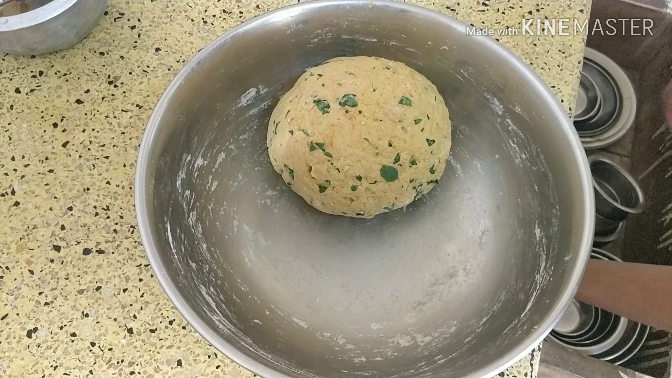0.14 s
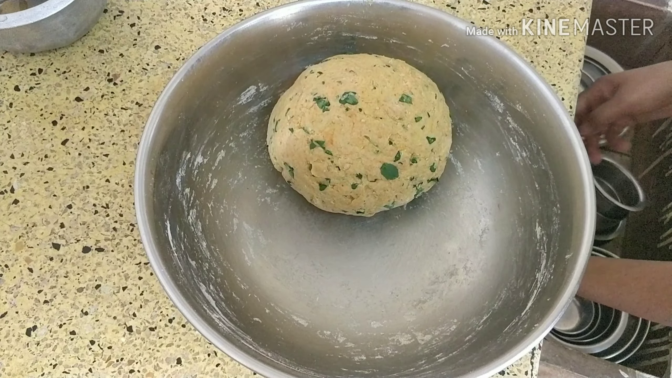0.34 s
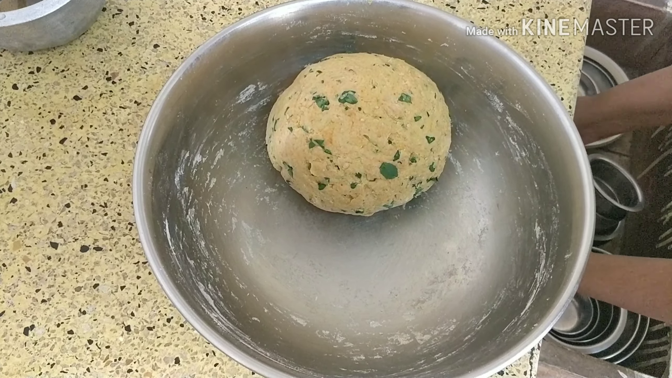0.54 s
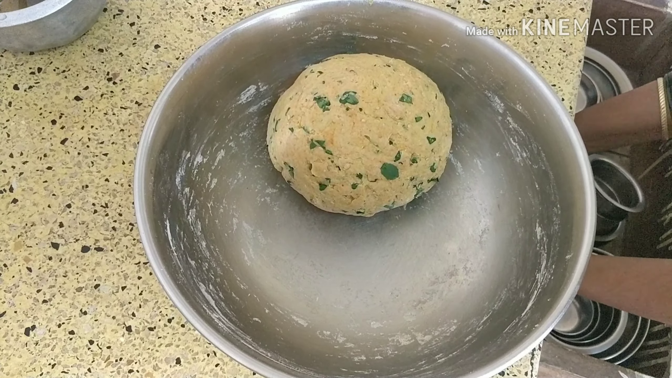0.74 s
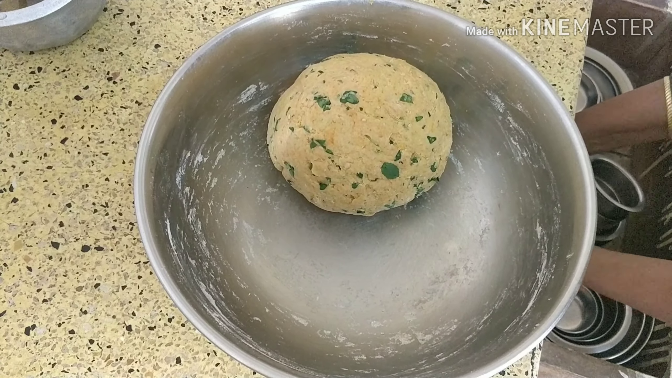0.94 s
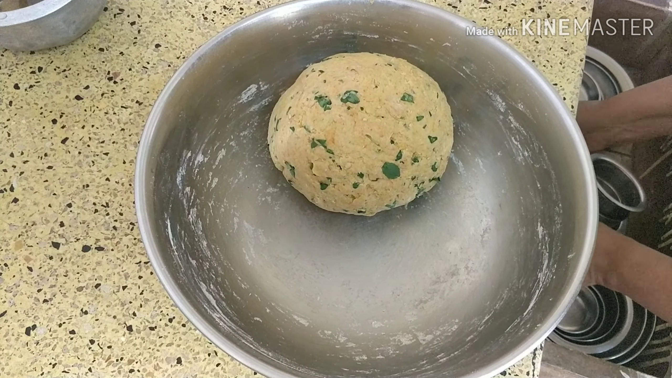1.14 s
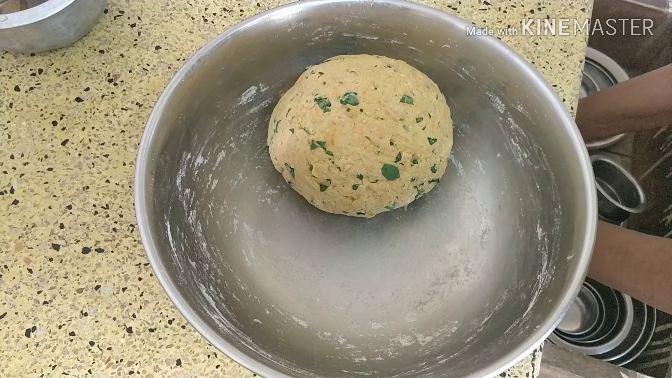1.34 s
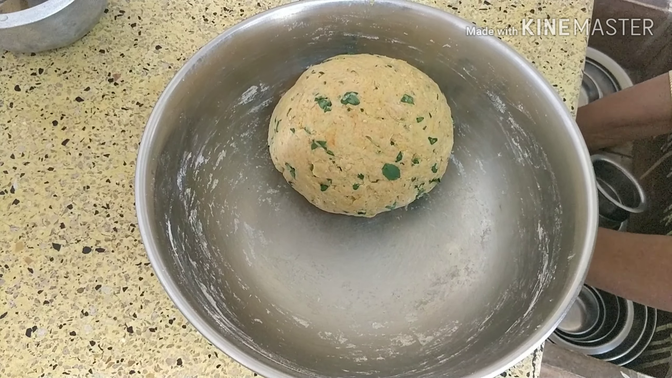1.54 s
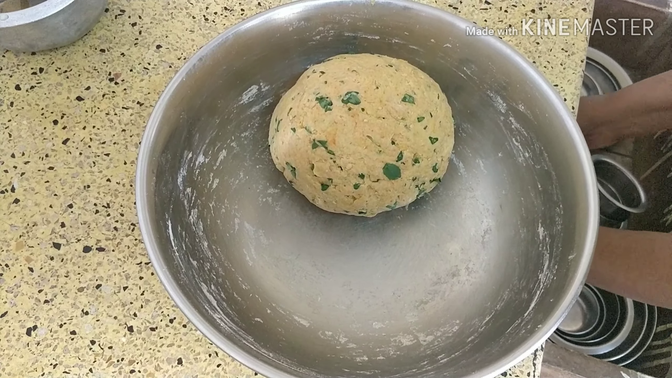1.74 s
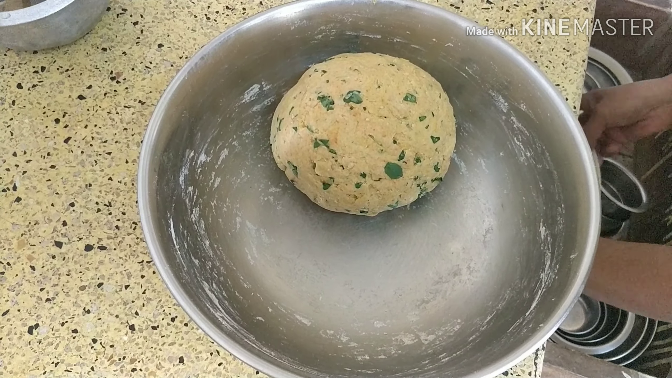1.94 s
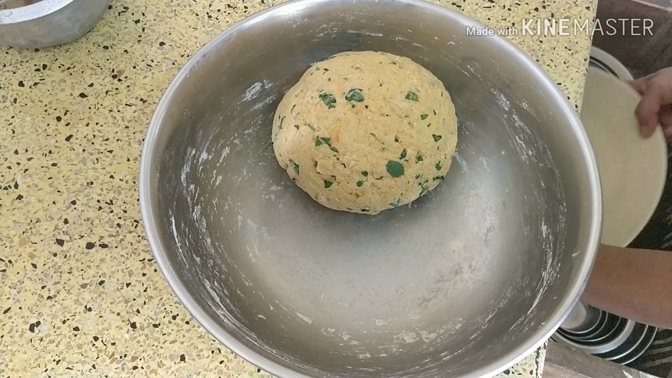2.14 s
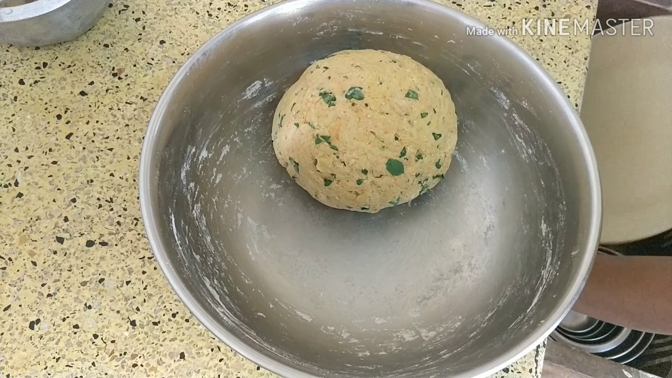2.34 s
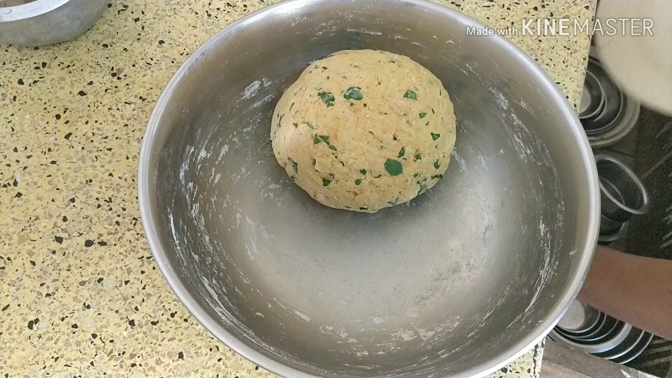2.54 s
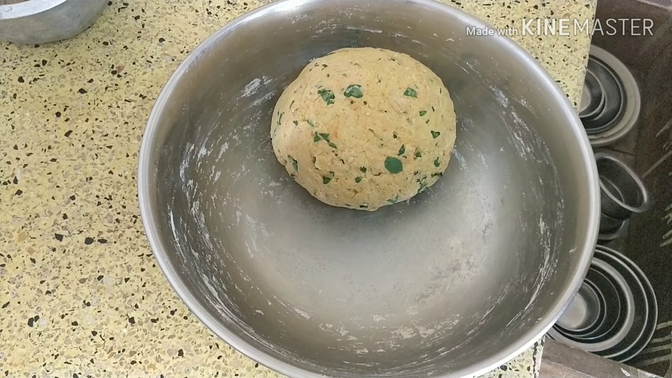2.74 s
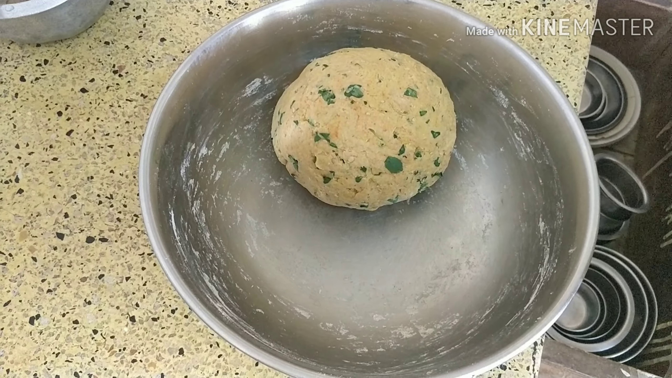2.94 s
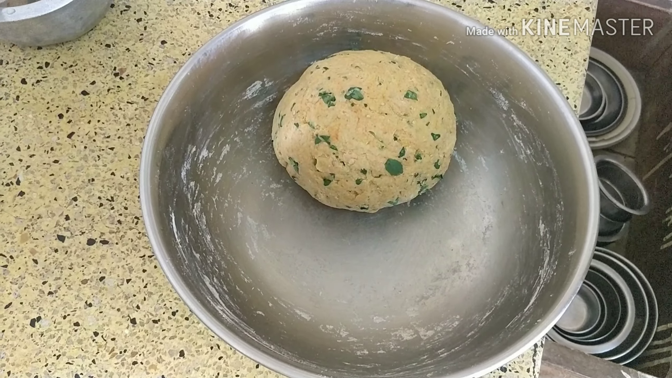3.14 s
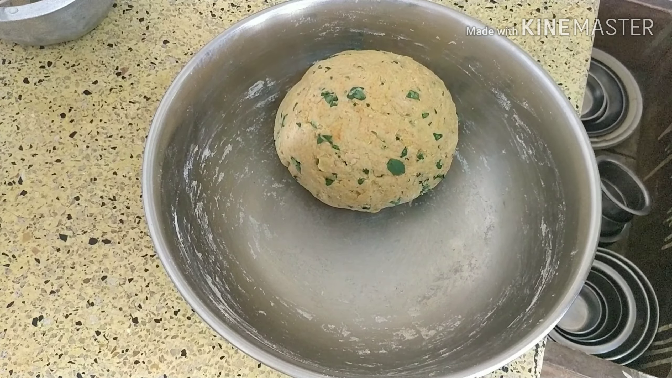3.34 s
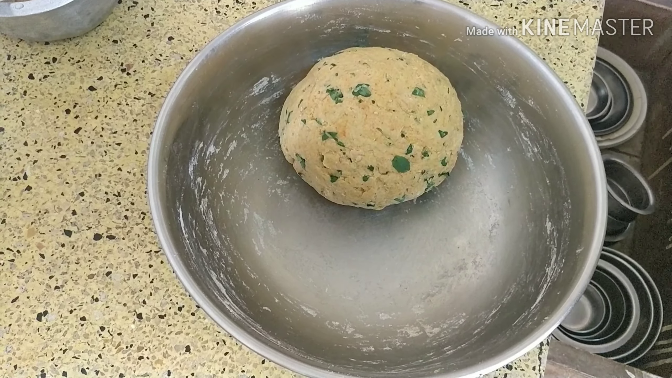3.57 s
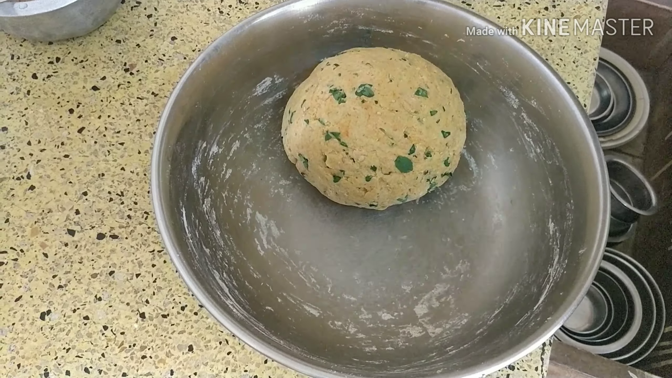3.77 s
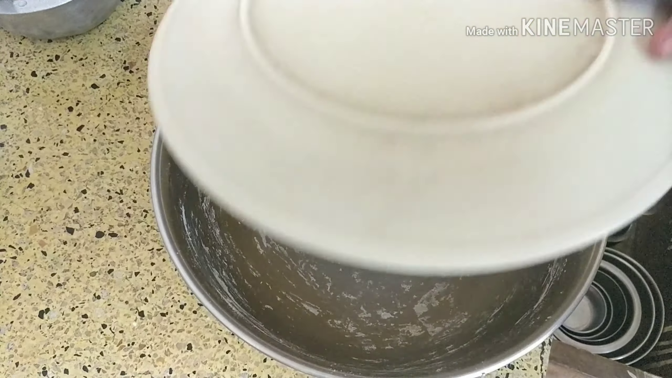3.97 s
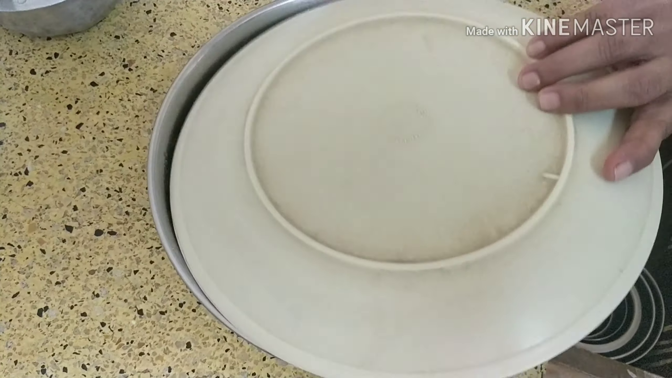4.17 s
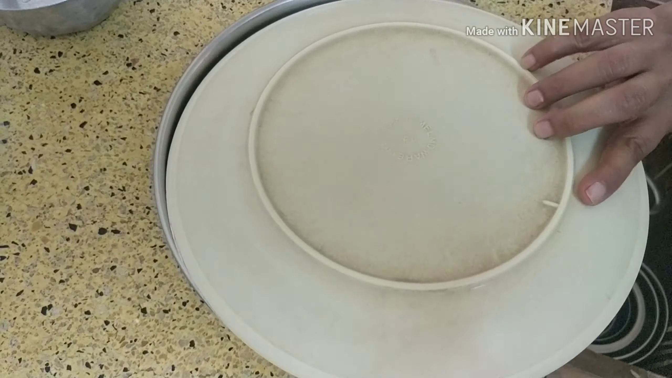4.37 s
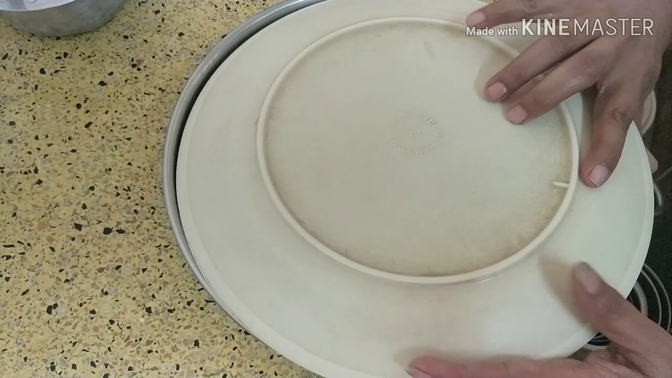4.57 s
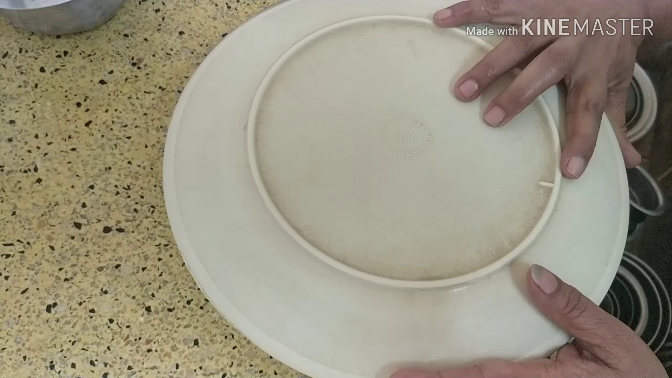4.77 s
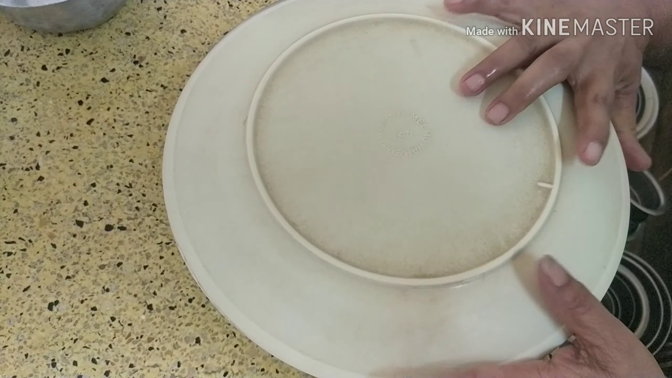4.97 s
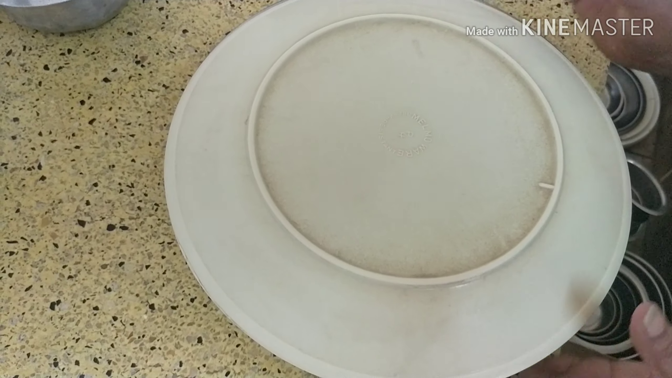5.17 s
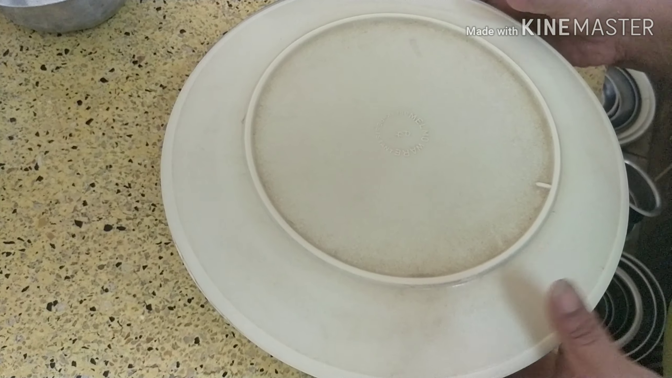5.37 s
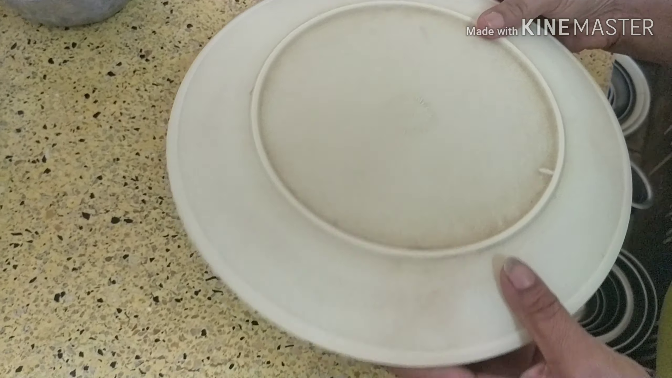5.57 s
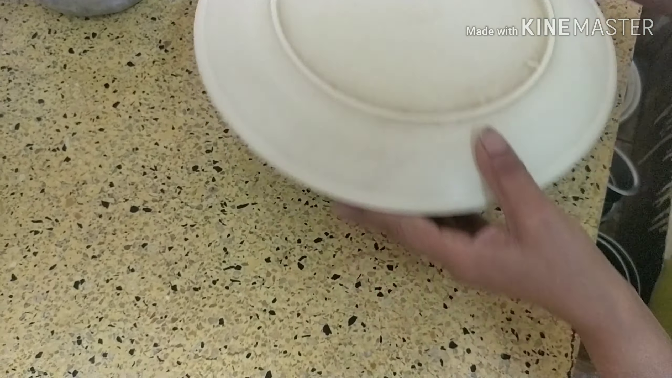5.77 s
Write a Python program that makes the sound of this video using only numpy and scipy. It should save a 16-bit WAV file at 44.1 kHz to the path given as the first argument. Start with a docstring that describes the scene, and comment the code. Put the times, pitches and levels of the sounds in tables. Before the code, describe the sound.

A low hum and faint rubbing of hands on dishes run throughout, heard from close above the counter of a small, reverberant kitchen. A hard plastic plate is worked out of a dish rack: a few light bumps at first, then irregular hollow knocks and rattles from about 0.8 seconds. Around 2 seconds they bunch together with a short juddering scrape and two tiny squeals, and a last knock comes near 2.5 seconds. A soft hiss swells around 3.2 seconds, followed by a tiny high tick. At about 4.1 to 4.3 seconds the plate lands on a steel bowl with a quick, sharp clatter, the loudest sound, and the metal rings briefly. At 4.7 seconds a dull, damped knock pushes it into place. A faint thin squeak and a softer thud follow around 5.3 seconds, then a soft swish near 5.8 seconds.

```python
"""A plastic plate laid on a steel bowl

A hard plastic plate is worked out of a dish rack, knocking, scraping and squealing by stick-slip
friction. Laid upside down on a steel bowl, it touches the rim, drops and chatters; the impacts excite
the modes of both. Pushed home, it gives a dull knock, damped by the hands. All is heard from close
above the counter of a small, reverberant kitchen, with a low hum and a soft hiss that comes and goes."""
import sys
import numpy as np
from scipy import signal
from scipy.fft import rfft, irfft, next_fast_len
from scipy.io import wavfile
from scipy.ndimage import uniform_filter1d

SR = 44100
rng = np.random.default_rng(int(sys.argv[2]) if len(sys.argv) > 2 else 0)


def store_pcm(level_fs):
    """Save levels as 16-bit WAV."""
    pcm = np.round(np.clip(level_fs, -1, 1) * 32767).astype(np.int16)
    wavfile.write(sys.argv[1], SR, np.atleast_2d(pcm).T)


N = 256044
TIME = np.arange(N) / SR
RING, LONG_RING = TIME[:32768], TIME[:49152]  # time axes of a single impact


def amp(db):
    """Amplitude ratio of a level in decibels."""
    return 10 ** (np.asarray(db) / 20)


def unit(x):
    """Normalisation to rms 1."""
    return x / np.sqrt(np.mean(x ** 2))


def unit_hit(x):
    """Normalisation to the energy of 10 ms at rms 1."""
    return unit(x) * np.sqrt(.01 * SR / x.shape[-1])


def along(points, hz):
    """Interpolation of (frequency [Hz], value) points over log frequency."""
    f, value = np.transpose(points)
    return np.interp(np.log(np.maximum(hz, 1)), np.log(f), value)


def walk(rate_hz):
    """Random modulation: straight lines between Gaussian values."""
    knots = rng.standard_normal(1024)
    return np.interp(TIME * rate_hz, np.arange(len(knots)), knots)


def add(out, s, x):
    """Superposition of a short sound at time s."""
    i = max(int(s * SR), 0)
    out[:, i:i + x.shape[-1]] += x[:, :max(out.shape[-1] - i, 0)]


def tint(x, points):
    """Minimum-phase filter through (frequency [Hz], gain [dB]) points."""
    n = 2 * next_fast_len(x.shape[-1] // 2 + 1, True)
    cepstrum = irfft(np.log(amp(along(points, np.fft.rfftfreq(n, 1 / SR)))))
    cepstrum[1:n // 2] *= 2
    cepstrum[n // 2 + 1:] = 0
    return irfft(rfft(x, n) * np.exp(rfft(cepstrum)))[..., :x.shape[-1]]


def pan(x, points):
    """Level difference between two microphone ports, varying with frequency."""
    return np.array([tint(port, [(hz, side * db / 2) for hz, db in points])
                     for port, side in zip(x, (1, -1))])


def diffuse(n, spectrum, incoherent_hz=1350):
    """Diffuse-field noise: coherent at the two ports in the bass, incoherent in the treble."""
    size = 2 * next_fast_len(n // 2 + 1, True)
    hz = np.fft.rfftfreq(size, 1 / SR)
    coherence = np.sinc(hz / incoherent_hz)
    phasors = np.exp(2j * np.pi * rng.random((2, len(hz))))
    mid, side = phasors * np.sqrt([1 + coherence, 1 - coherence]) * amp(along(spectrum, hz))
    return unit(irfft([mid + side, mid - side])[:, :n])


def fade(t60):
    """Exponential decay by 60 dB in t60 seconds."""
    return np.exp(-np.log(1000) * RING / t60)


def comb(count=260):
    """Constant modal density: one spectral line at random in each of count equal bands."""
    lines = np.zeros(len(RING) // 2 + 1)
    places = (np.arange(count) + rng.random(count)) / count
    lines[(places * .74 * len(lines)).astype(int)] = 1
    return lines


def clack(spectrum, t60, lines, crack_db=0):
    """Impulse response of a dish: dense, heavily damped modes over a broadband crack."""
    white = diffuse(len(RING), [(20, 0), (20000, 0)])
    modes = unit(irfft(rfft(white) * lines)) * fade(t60)
    crack = amp(crack_db) * white * fade(t60 / 2)
    return unit_hit(tint(modes + crack, spectrum))


def ring(modes, gains_db=0, apart_hz=2500, time=RING):
    """Free vibration: damped sinusoids of varying strength, the high ones out of phase at the ports."""
    hz, db, t60 = np.transpose(modes)
    chance = rng.standard_normal((len(hz), 3)).T
    size = amp(db + gains_db + chance[:2])
    phase = np.array([[1], [-1]]) * np.minimum(hz / apart_hz, 1) * chance[2]
    waves = np.exp(np.outer(2j * np.pi * hz - np.log(1000) / np.clip(t60, .01, 3), time))
    return unit_hit(((size * np.exp(1j * phase)) @ waves).imag)


def strokes(rows, fullness=2, drop_db=20):
    """Envelope of smooth strokes, drop_db down one rise before and one fall after each peak."""
    return sum(amp(db - drop_db * (abs(TIME - s) / np.where(TIME < s, rise, fall)) ** fullness)
               for s, db, rise, fall in rows)


# Hum and whine: (frequency [Hz], level [dB], modulation depth [dB])
HUM_TONES = [(66.8, -46.5, -4), (107.2, -49, 3.5), (4950, -73.5, 1)]
# Room rumble: (frequency [Hz], spectral level [dB])
RUMBLE_SPECTRUM = [(13, -25), (22, -1.5), (112, -2), (179, -23.5), (356, -15.5), (387, -14.5), (432, -25),
                   (524, -14), (935, -27), (1020, -28), (2260, -37.5), (2590, -36), (3510, -42.5),
                   (14700, -44), (16000, -45)]
def background(rumble_db=-46, drift_hz=4):
    """Ambient noise: a rumble, and tones under slow amplitude and frequency modulation."""
    hum = 0
    for hz, db, depth_db in HUM_TONES:
        gain = amp(db + depth_db * walk(12))
        hum += gain * np.sin(2 * np.pi * np.cumsum(hz + drift_hz * walk(12)) / SR)
    return diffuse(N, RUMBLE_SPECTRUM) * amp(rumble_db + walk(4.15)) + hum


# Hands shifting dishes: (peak time [s], level [dB], rise [s], fall [s])
RUB_STROKES = [(.02, -40, 0.057, 0.14), (.26, -43, 0.13, 0.035), (1.45, -37, 1, 0.13),
               (1.69, -35, 0.095, 0.086), (2.25, -42, 0.35, 1), (4.85, -38, 0.47, 0.017),
               (5.4, -44, 0.2, 0.15), (5.8, -36, 0.33, 0.22)]
# Dull rubbing: (frequency [Hz], spectral level [dB])
RUB_SPECTRUM = [(45, -23.5), (70, 15.5), (110, -30), (185, 6.5), (240, -18), (295, -4), (550, -10),
                (1100, -17), (1600, -27), (5000, -23), (12000, -82)]
def rubbing(gain_db=-2, resting_db=-53):
    """Friction noise of hands and dishes, swelling unevenly with each movement."""
    envelope = np.hypot(strokes(RUB_STROKES), amp(resting_db))
    return diffuse(N, RUB_SPECTRUM) * envelope * amp(gain_db + 2 * walk(30))


# Rack impacts: (time [s], level [dB], hardness [dB], top edge [dB], rattle [s], favoured pitch [Hz])
RACK_IMPACTS = [(0.114, -39, -1.5, -9, .023, 566), (0.243, -43, 0.5, -4, 0.034, 200),
                (0.502, -57.5, 13.5, 11, 0.0049, 290), (0.752, -39.5, -1.5, -8, 0.027, 360),
                (0.807, -25, 0.5, 3, 0.014, 890), (0.842, -28.5, 1, -4, 0.014, 382),
                (1.007, -26, 0, -1.5, 0.0038, 1080), (1.139, -28.5, 6.5, -0.5, 0.006, 120),
                (1.146, -22, -5.5, -2, 0.024, 390), (1.290, -27.5, 0.5, -1, 0.0046, 1070),
                (1.379, -42, 7, -11, 0.0032, 604), (1.437, -38.5, -8, -10, 0.0034, 294),
                (1.477, -34.5, -8, -16, 0.0045, 600), (1.525, -45.5, -5, -2, 0.0079, 290),
                (1.585, -28, -1, 1, 0.008, 185), (1.679, -39.5, -6, -10, .011, 1130),
                (1.845, -36, 8, 3.5, 0.0058, 596), (1.971, -26.5, -2.5, -5, 0.0079, 990),
                (2.018, -27, -2.5, -2, .004, 740), (2.067, -26, -2, 1, 0.0059, 650),
                (2.080, -21, 5.5, -0.5, .01, 530), (2.112, -26, -2.5, 1, .0056, 620),
                (2.164, -22, 1, -5, .0075, 790), (2.181, -22, -14, 12, .0053, 525),
                (2.226, -26, 1.5, 0.5, 0.034, 760), (2.296, -50, -12, -12, 0.0052, 510),
                (2.441, -32, 6.5, -4.5, .006, 199), (2.451, -24.5, -3.5, -4.5, 0.024, 107)]
# Clack in the rack: (frequency [Hz], spectral level [dB])
RACK_SPECTRUM = [(62, -14), (100, -1.5), (190, 5), (280, -3.5), (480, 3), (780, -2), (1050, -11),
                 (1500, -19), (2400, -16.5), (3400, -15), (5000, -13), (9300, -22), (14500, -22.5),
                 (16000, -67)]
# Low tones of the plate and ringing of the steel dishes in the rack: (frequency [Hz], level [dB], T60 [s])
DISH_MODES = [(112, 2, .2), (186, 5.5, .22), (295, -2, .35), (361, -8, .14), (457, -1, .16), (545, -3, .1),
              (635, -1, .13), (800, -1, .1), (1040, -11, .14), (1132, -11, .34), (1175, -12, .25),
              (1750, -12, .1), (2230, -12, .08), (2810, -11, .08), (4450, -8, .06), (4750, -7, .08),
              (5360, -7, .07)]
def rack_knocks(t60=0.046, ring_db=-4.5, free_at_s=2.12, free_for_s=0.15, grip_detune=0.048,
                contacts=3, bounce_db=-4, gap_ratio=.7, favour_db=5, favour_ratio=1.31):
    """Inelastic impact: the plate bumps its neighbours and rebounds, each time weaker and duller."""
    out = np.zeros((2, N))
    order = np.arange(contacts)
    for s, db, hard_db, edge_db, rattle_s, favoured_hz in RACK_IMPACTS:
        # a freely hanging plate gives less thump and more hollow midrange
        free = np.exp(-((s - free_at_s) / free_for_s) ** 2)
        thump_db = np.interp(free, [0, 1], [-6, -10])
        hollow_db = np.interp(free, [0, 1], [-5, -0.1])
        # grip and support shift the low modes
        modes = [(hz * (1 + (hz < 1000) * grip_detune * rng.standard_normal()), level, decay)
                 for hz, level, decay in DISH_MODES]
        tones, lines = amp(ring_db) * ring(modes), comb(110)
        gaps = (order > 0) * gap_ratio ** order * (1 + rng.random(contacts))
        knock = np.zeros((2, len(RING)))
        for k, delay_s in enumerate(rattle_s * np.cumsum(gaps) / gaps.sum()):
            touch = [(404, thump_db + 3 * k), (660, hollow_db), (880, hollow_db), (1200, 0),
                     (1700, hard_db), (5000, hard_db), (11000, hard_db + edge_db - 3 * k)]
            bounce = tint(clack(RACK_SPECTRUM, t60, lines) + tones, touch)
            add(knock, delay_s, amp(k * bounce_db) * bounce)
        spot = [(favoured_hz / favour_ratio, 0), (favoured_hz, favour_db),
                (favoured_hz * favour_ratio, 0)]
        add(out, s, amp(db) * tint(knock, spot))
    return out


# Pull out of the rack: (time [s], level [dB])
SCRAPE_LEVELS = [(1.3, -86), (1.8, -48), (1.9, -39.5), (2.04, -41.5), (2.1, -25.5), (2.27, -58),
                 (2.34, -95)]
# Sliding edge: (frequency [Hz], spectral level [dB])
SCRAPE_SPECTRUM = [(150, -22), (350, 2), (560, 0.5), (820, -2.5), (1100, -3), (1450, -13.5), (2250, -10.5),
                   (3400, -12), (5200, -5), (9300, -18.5), (14500, -17), (16000, -46)]
def scrape(grit_db=-2, judder_db=-7, t60=0.13, catches_per_s=42, bunch_s=0.01, steady=0.42,
           slips_per_s=170, slip_spread_db=4.5, edge_points=4):
    """Stick-slip friction: each release judders the plate and strengthens tiny slips along its edge."""
    times, levels = np.transpose(SCRAPE_LEVELS)
    pulling = (TIME >= times[0]) * (TIME <= times[-1])
    envelope = uniform_filter1d(amp(np.interp(TIME, times, levels)) * pulling, size=900)
    jitter, weaker_db = rng.standard_normal((128, 2)).T
    at = times[0] + np.cumsum(np.exp(.3 * jitter)) / catches_per_s
    inside = at < TIME[-1]
    catches = np.zeros(N)
    catches[(at[inside] * SR).astype(int)] = amp(-weaker_db[inside])
    sliding = steady + unit(signal.lfilter([1], [1, -np.exp(-1 / (bunch_s * SR))], catches))
    grit, lines = 0, comb(90)
    for _ in range(edge_points):
        slipping = rng.random(N) < slips_per_s / edge_points / SR
        sizes = amp(slip_spread_db * np.minimum(rng.exponential(size=N), 3))
        slips = slipping * sizes * rng.choice([-1, 1], N) * sliding
        response = clack(SCRAPE_SPECTRUM, t60, lines, crack_db=-3)
        grit += signal.fftconvolve(slips[None], response, axes=1)[:, :N]
    body = clack(SCRAPE_SPECTRUM, t60, comb()) + amp(-4) * ring(DISH_MODES)
    body = tint(body, [(300, -7), (520, 0), (900, -1), (2000, -3)])
    judder = signal.fftconvolve(catches[None], body, axes=1)[:, :N]
    return (amp(grit_db) * unit(grit) + amp(judder_db) * unit(judder)) * envelope


# Soft swishes: (peak time [s], level [dB], rise [s], fall [s], brightness [dB])
SWISH_STROKES = [(2.0, -51, 0.3, 0.66, 2), (3.25, -46.5, 0.45, 0.26, 14.5), (3.67, -54.5, 0.19, 0.089, -16),
                 (4.69, -50.5, 0.14, 0.13, -3), (5.45, -58.5, 0.16, 0.25, -8), (5.75, -43, 0.14, 0.26, 4)]
# Hiss: (frequency [Hz], spectral level [dB])
HISS_SPECTRUM = [(900, -43), (1500, -11), (2200, -9.5), (5200, 0.5), (6100, -3.5), (8200, -2),
                 (10500, -3.5), (14500, -2.5), (16000, -0.5)]
def swishes(gain_db=-1, flutter_db=1.5):
    """Amplitude-modulated noise: a narrower envelope on the treble brightens each swish at its peak."""
    body = strokes([row[:4] for row in SWISH_STROKES], fullness=4.6)
    bright = strokes([(s, db + bright_db, rise, fall)
                      for s, db, rise, fall, bright_db in SWISH_STROKES], drop_db=40)
    treble = tint(diffuse(N, HISS_SPECTRUM), [(7000, -14), (13500, 0)])
    hiss = diffuse(N, HISS_SPECTRUM) * body + treble * bright
    return hiss * amp(gain_db + flutter_db * walk(64))


# The edge sliding free: (time [s], level [dB], start pitch [Hz], end pitch [Hz], duration [s])
EDGE_SQUEALS = [(2.095, -41, 3200, 3310, 0.044), (2.165, -42, 2950, 3525, 0.077)]
# A late, thin squeak: (time [s], level [dB], start pitch [Hz], end pitch [Hz], duration [s])
THIN_SQUEAKS = [(5.264, -37.5, 12000, 14750, 0.02)]
def squeaks(rows, rough_hz, grit_db=-24):
    """Friction-induced oscillation: rising tones roughened by random frequency modulation."""
    out = np.zeros((2, N))
    for s, db, start_hz, end_hz, length in rows:
        progress = np.minimum(RING / length, 1)
        hz = start_hz + (end_hz - start_hz) * progress + rough_hz * rng.standard_normal((2, len(RING)))
        tone = np.sin(2 * np.pi * np.cumsum(hz, axis=1) / SR)
        grit = amp(grit_db) * rng.standard_normal(hz.shape)
        add(out, s, amp(db) * np.sin(np.pi * progress) * (tone + grit))
    return out


# Very high tick: (frequency [Hz], spectral level [dB])
TICK_SPECTRUM = [(1000, -33.5), (6500, -18.5), (11300, -17.5), (12100, -2), (15000, -4), (16000, -3)]
def tick(at_s=3.7662, level_db=-34, rise_s=0.0007, t60=0.01):
    """A transient: one tiny noise burst with rapid exponential decay."""
    out = np.zeros((2, N))
    burst = diffuse(len(RING), TICK_SPECTRUM) * np.minimum(RING / rise_s, 1) * fade(t60)
    add(out, at_s, amp(level_db) * unit_hit(burst))
    return out


def contact(x, db, thump_db, edge_db, clang_db=0):
    """Excitation spectrum: a heavy contact favours the lows, a firm one the middle, a sharp the top."""
    return amp(db) * tint(x, [(130, thump_db - 16), (260, thump_db), (600, thump_db), (1000, 0.0059),
                              (1800, 0.0034), (3100, clang_db), (5000, 0.0043), (11000, edge_db)])


def steel_overtones(low_hz=2900, high_hz=10500, level_db=-24, low_t60=0.66, count=30):
    """Weak, uneven modes of a thin steel shell; damping grows with frequency."""
    place, strength = rng.random((count, 2)).T
    hz = low_hz * (high_hz / low_hz) ** ((np.arange(count) + place) / count)
    return np.transpose([hz, level_db + 10 * (strength - .5), low_t60 * np.sqrt(low_hz / hz)])


# Rim impacts: (time [s], level [dB], top edge [dB], steel ring [dB], clink [dB], favoured pitch [Hz])
RIM_IMPACTS = [(4.133, -18, 15.5, -5, 0, 5000), (4.2115, -11.5, 3, -9, -24, 7950),
               (4.2165, -15, -3, -4, -20, 7600), (4.227, -14, 0, -10, -17, 1650),
               (4.232, -13, 0, 0, -19, 1150), (4.2548, -20, -1, 10, -25, 1650),
               (4.261, -13, -9, -5, -26, 3700), (4.274, -22.5, -2, -2, -17, 1800)]
# Clack on the rim: (frequency [Hz], spectral level [dB])
RIM_SPECTRUM = [(150, -62.5), (235, -24), (320, -8.5), (450, 0), (600, 3.5), (800, -11), (1100, -9),
                (1300, -13.5), (1750, -10), (2300, -18.5), (3100, -26), (3800, -17), (4600, -30.5),
                (5600, -21.5), (7500, -18.5), (8600, -26.5), (9400, -30), (14800, -31.5), (16000, -47.5)]
# Modes of the bowl, the plate and its edge: (frequency [Hz], level [dB], T60 [s])
STEEL_MODES = [(1003, -9, .33), (1104, -8, .25), (1118, -4, .33), (1131, -2, .42), (1165, -8, .25),
               (1265, -13, .44), (1355, -13, .25), (1410, -13, .25), (1592, -7, .48), (1606, -11, .3),
               (1621, -5, .3), (1669, -13, .5), (1715, -5, .4), (1770, -7, .26), (1960, -13, .4),
               (2040, -19, .8), (2078, -13, .45), (2202, -14, .5), (2681, -30, 2.6), (2686, -34, 2),
               (2945, -15, .4), (3180, -19, .6), (3448, -26, 1.5), (3577, -10, .33), (3623, -13, .45),
               (3698, -15, .4), (3714, -14, .6), (3895, -8, .45), (3910, -12, .35), (4232, -16, .5),
               (4430, -14, .5), (4442, -19, .3), (4942, -22, .8), (5080, -15, .35), (5410, -11, .38),
               (5635, -8, .46), (5897, -13, .28), (6325, -13, .3), (6520, -15, .42), (7255, -17, .3),
               (7467, -5, .24), (7650, -15, .33), (7745, -10, .2), (8093, -17, .4), (8475, -16, .4),
               (8750, -15, .25), (9050, -16, .23), (9385, -24, .35), (10130, -20, .22), (10390, -23, .25)]
PLASTIC_MODES = [(293, -6, .36), (372, -12, .25), (426, -4, .3), (485, -8, .25), (552, -2, .33),
                 (624, -2, .22), (1035, -10, .14), (1770, -13, .12)]
EDGE_MODES = [(1045, -1, .14), (1480, -8, .06), (1760, 0, .1), (2560, -10, .05), (3880, -6, .07),
              (4240, -5, .1), (4440, -5, .1), (4640, -5, .12), (4800, -7, .1), (5080, -5, .1),
              (5430, -6, .14), (5626, 1, .13), (6433, -5, .12), (8230, -4, .08), (8850, -3, .08)]
# Near field of the bowl at the ports: (frequency [Hz], left minus right [dB])
BOWL_BALANCE = [(300, -2.5), (550, 3), (1700, 1), (3500, 1), (4430, -1), (5400, -5), (7500, -1.5),
                (12000, 0)]
def plate_on_bowl(clack_db=2, plate_db=-1, bowl_db=-2, t60=0.054, drop_s=4.216, settle_s=0.0094,
                  favour_db=7, favour_octaves=0.18):
    """Modal excitation by impact: the contact point on the rim selects which bowl modes ring most."""
    clacks, ringing = np.zeros((2, 2, N))
    shell, lines = np.vstack([STEEL_MODES, steel_overtones()]), comb(170)
    for s, db, edge_db, steel_db, clink_db, favoured_hz in RIM_IMPACTS:
        # once the weight is down, the chatter thumps less and clangs more
        thump_db = np.interp(s - drop_s, [0, settle_s], [-3, -7])
        clang_db = np.interp(s - drop_s, [0, settle_s], [2, 6.5])
        favoured = favour_db * np.exp(-(np.log2(shell[:, 0] / favoured_hz) / favour_octaves) ** 2)
        tones = amp(plate_db) * ring(PLASTIC_MODES) + amp(clink_db) * ring(EDGE_MODES)
        impact = clack(RIM_SPECTRUM, t60, lines, crack_db=-3.5)
        add(clacks, s, contact(impact, db + clack_db, thump_db, edge_db, clang_db))
        add(ringing, s, contact(tones, db, thump_db, edge_db=0))
        add(ringing, s, amp(db + steel_db + bowl_db) * ring(shell, favoured, time=LONG_RING))
    buzz = 1 + .13 * walk(170)  # the loose contact roughens the ring
    return pan(clacks, BOWL_BALANCE), pan(ringing * buzz, BOWL_BALANCE)


# The plate pushed home: (time [s], level [dB], hardness [dB], rise time constant [s])
SEATING_SHOVES = [(4.69, -26.5, 3, 0.011), (4.702, -30.5, 6, 0.0079), (4.712, -28, 6.5, 0.0028),
                  (4.7396, -15, 7.5, 0.00095), (4.771, -24, 4.5, 0.0028), (5.312, -34.5, -7, 0.022),
                  (5.338, -31.5, -25, 0.069)]
# Dull knock: (frequency [Hz], spectral level [dB])
SHOVE_SPECTRUM = [(71, -61), (120, -5), (301, 2), (362, -4.5), (643, -6), (742, -15.5), (892, -7),
                  (1150, -17), (1980, -25), (2340, -23), (3310, -27.5), (5630, -27.5), (6240, -33),
                  (14400, -45.5), (16000, -46)]
def shoves(t60=0.11, plate_db=2, held_decay_ratio=0.13, db_per_octave=-14):
    """Damping by the hands: the plate thuds, mostly in its lowest mode; a hard shove adds crispness."""
    out = np.zeros((2, N))
    held = [(hz, db + db_per_octave * np.log2(hz / PLASTIC_MODES[0][0]), decay * held_decay_ratio)
            for hz, db, decay in PLASTIC_MODES]
    for s, db, hard_db, rise_s in SEATING_SHOVES:
        body = clack(SHOVE_SPECTRUM, t60, comb()) + amp(plate_db) * ring(held)
        thud = unit_hit(body * (1 - np.exp(-RING / rise_s)))
        crispness = [(600, 0), (1000, 0.012), (4000, hard_db / 2), (11000, 2 * hard_db)]
        add(out, s, amp(db) * tint(thud, crispness))
    return out


# Reverberation times: (frequency [Hz], T60 [s])
ROOM_T60 = [(100, 0.77), (300, 0.63), (1000, 0.64), (4500, 0.55), (8000, 0.45), (14000, 0.28)]
def kitchen(x, build_s=0.0016):
    """Reverberation: dense reflections from hard walls build up quickly, and the treble decays first."""
    hz = np.fft.rfftfreq(len(RING), 1 / SR)
    echoes = rfft(diffuse(len(RING), [(100, -0.024), (1000, -0.13), (6000, -0.97), (14000, 2.2)]))
    tail = 0
    for band_hz, t60 in ROOM_T60:
        band = along([(f, f == band_hz) for f, _ in ROOM_T60], hz)
        tail += irfft(echoes * band) * fade(t60)
    tail *= 1 - np.exp(-(RING / build_s) ** 2)
    return signal.fftconvolve(x, unit(tail) / np.sqrt(len(RING)), axes=1)[:, :N]


def scene():
    """Direct plus reverberant field: the rack, further off than the bowl, is the more reverberant."""
    clacks, ringing = plate_on_bowl()
    rack = rack_knocks() + scrape() + squeaks(EDGE_SQUEALS, rough_hz=900)
    # (signal, reverberant level [dB])
    sources = [(rack, -1), (clacks, -4), (ringing, -12), (shoves(), -5),
               (squeaks(THIN_SQUEAKS, rough_hz=2100) + tick(), -5)]
    direct = sum(x for x, _ in sources)
    walls = kitchen(sum(amp(room_db) * x for x, room_db in sources))
    return direct + walls + rubbing() + swishes() + background()


# Response of the microphone ports: (frequency [Hz], left minus right [dB])
PORT_BALANCE = [(100, 1.5), (350, 0), (620, 2), (1000, 0), (2600, 1.5), (4400, -1.5), (6500, -4),
                (8600, -9), (10500, -1), (12500, 1.5), (14500, 11.5)]
def record(dry, delay_samples=7, cutoff_hz=15550):
    """Transduction: each port colours the sound, the left lags, peaks saturate and the top is cut."""
    left, right = pan(dry, PORT_BALANCE)
    left = np.pad(left, (delay_samples, 0))[:N]
    lowpass = signal.ellip(8, .2, 70, cutoff_hz, fs=SR, output="sos")
    return signal.sosfilt(lowpass, np.tanh([left, right]))


dry = scene()
out = record(dry)
store_pcm(out)
```